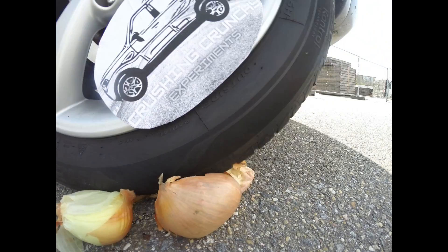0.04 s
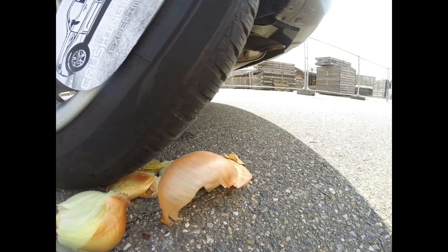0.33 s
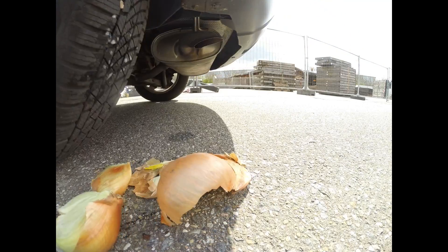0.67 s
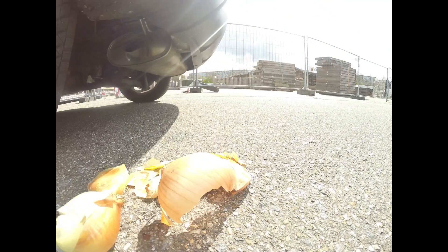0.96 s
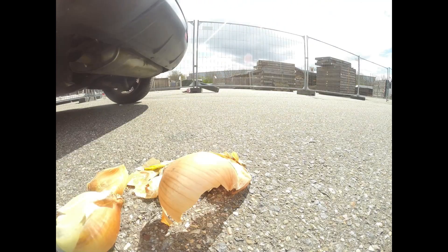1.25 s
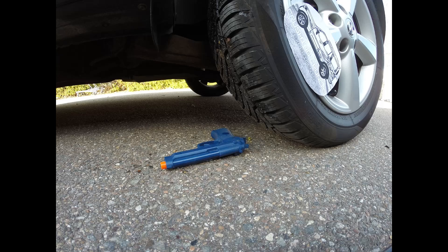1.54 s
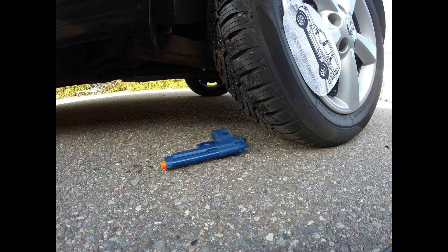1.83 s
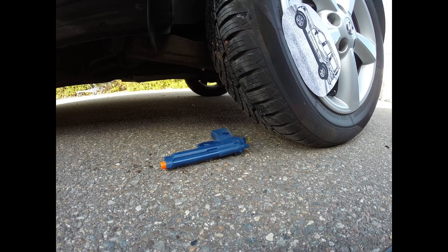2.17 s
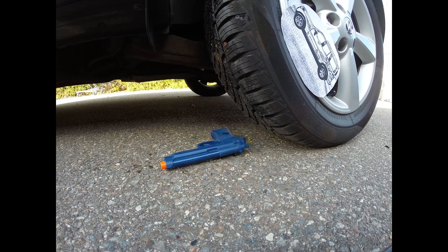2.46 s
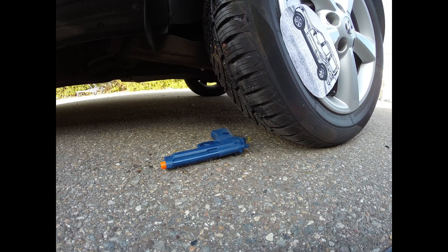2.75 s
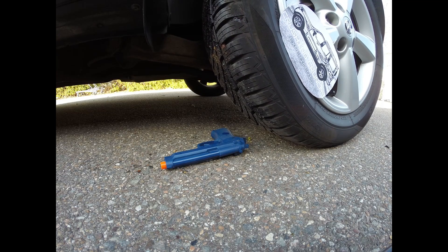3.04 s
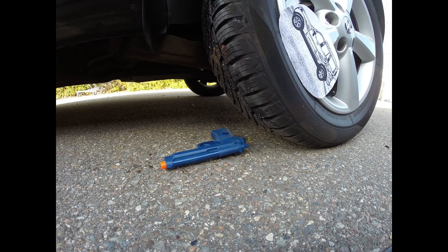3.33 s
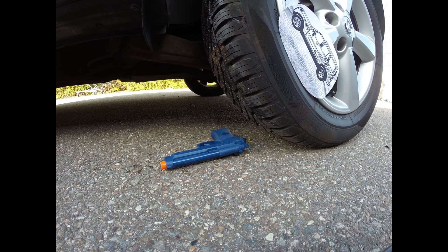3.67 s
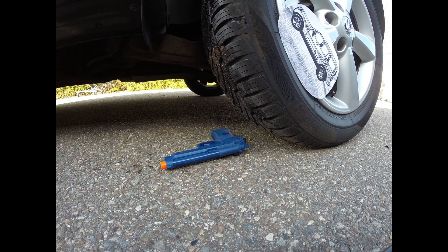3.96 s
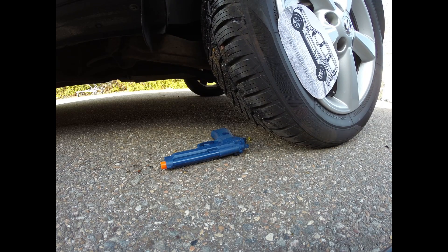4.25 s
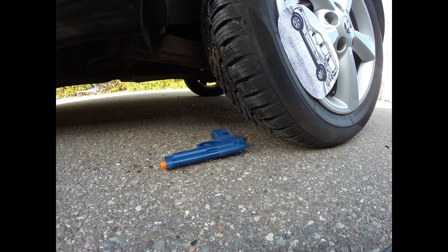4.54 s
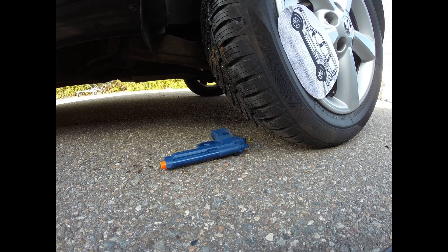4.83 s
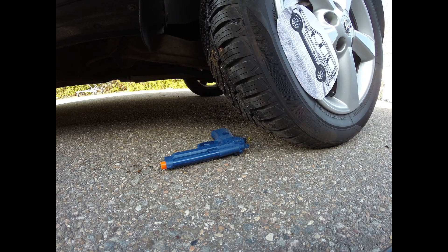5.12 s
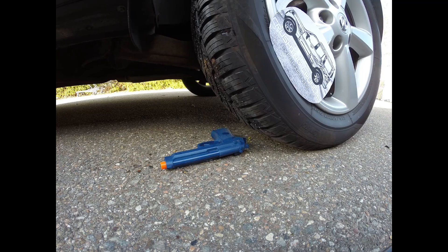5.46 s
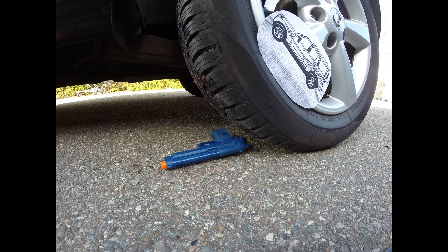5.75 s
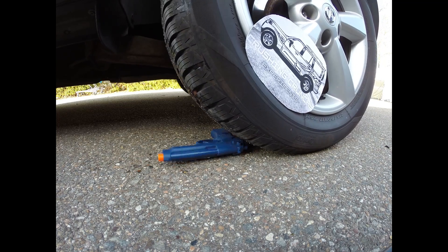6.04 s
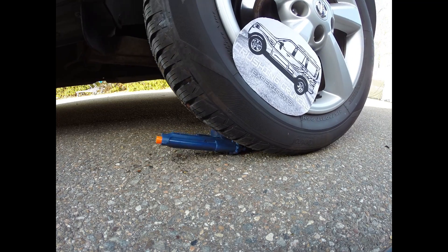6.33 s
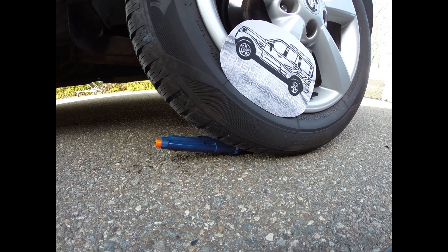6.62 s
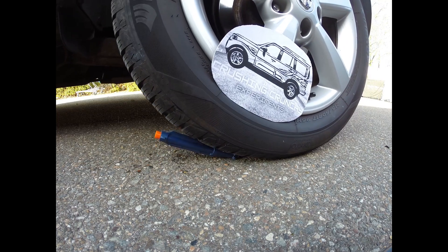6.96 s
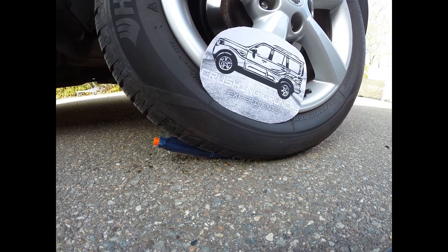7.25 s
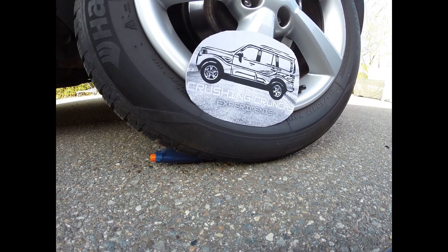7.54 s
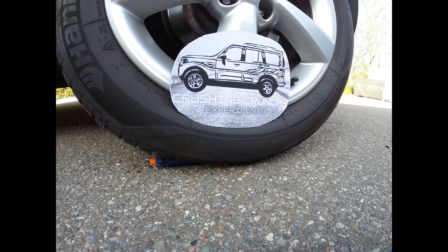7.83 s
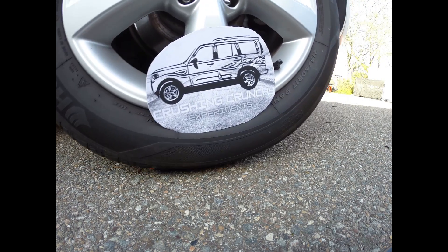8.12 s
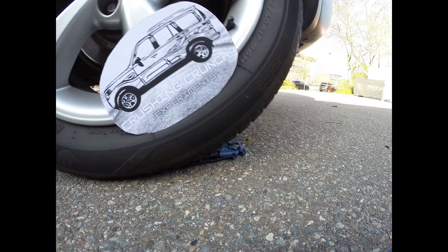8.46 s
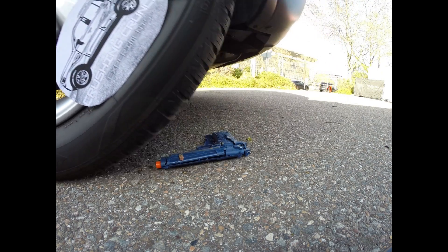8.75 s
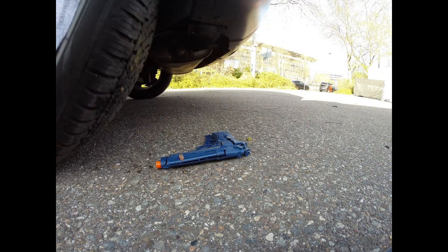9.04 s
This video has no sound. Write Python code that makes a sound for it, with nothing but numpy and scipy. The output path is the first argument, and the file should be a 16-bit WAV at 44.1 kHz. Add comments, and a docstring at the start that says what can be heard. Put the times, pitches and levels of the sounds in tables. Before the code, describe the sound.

Faint onion skin crackles under a creeping car, then a hollow plastic toy cracks loudly beneath the tyre over a low engine hum.

```python
"""On asphalt, close to the ground, a creeping car squashes an onion, whose skin snaps faintly.
After a brief silence a second scene begins: the tyre climbs a hollow plastic toy pistol. Brittle fracture
rings its shell in sharp cracks that echo under the car and set the tyre booming. The engine hums and
whirrs in both scenes, ducked by a limiter after the loudest cracks; something squeaks faintly and high."""
import sys
import numpy as np
from scipy import signal
from scipy.fft import rfft, irfft, next_fast_len
from scipy.io import wavfile
from scipy.ndimage import uniform_filter1d, minimum_filter1d, map_coordinates

SR = 44100
rng = np.random.default_rng(int(sys.argv[2]) if len(sys.argv) > 2 else 0)


def file_out(sig):
    """Save sig as 16-bit WAV at sys.argv[1]."""
    # one column per channel
    cols = np.atleast_2d(sig).T
    # limit, then scale
    lim = np.clip(cols, -1, 1)
    pcm = np.round(lim * 32767).astype(np.int16)
    wavfile.write(sys.argv[1], SR, pcm)


N = 405279

# Spectrum of a breaking shell. Each row: frequency in Hz, gain in dB.
SHELL_SPECTRUM = [(60, -5), (250, 3), (400, 0.5), (560, -1), (850, 2), (1200, -1), (1600, 3), (2500, -0.5),
                  (3500, 0), (4300, 9.5), (6500, 10), (8500, 4.5), (11000, -6.5), (15000, -25)]


def toy_cracks():
    """Impulse excitation: each break rings the hollow toy and drops the tyre, which rings too."""
    # Each row: start in seconds, level in dB, t60 in seconds, panel ring in Hz, splinter ring in Hz,
    # hollowness in dB, thump in dB.
    breaks = [(6.299, -47, 0.022, 2150, 4360, -14.5, -8), (6.3939, -45.5, 0.019, 1650, 4220, -11.5, -9),
              (6.4145, -49, 0.044, 1430, 6350, -15, -4), (6.895, 3, .049, 1560, 4130, 2.5, 2),
              (6.932, -5.5, 0.041, 2220, 6100, -1, 5), (6.95, -3, .028, 2350, 5660, -5, -1),
              (7.134, -40.5, 0.012, 2260, 4920, -1.5, -8.5), (7.3668, -33, .016, 800, 5695, 4.5, 4.5),
              (7.4523, -13, 0.027, 2250, 4640, 6.5, -17), (7.4744, -8.5, 0.019, 1570, 5180, -2, -13.5),
              (7.6435, -19, 0.015, 900, 4500, 5, 6), (7.7363, -20.5, 0.0087, 898, 5080, -8.5, -18),
              (7.783, -13.5, 0.01116, 1622, 5460, 7, -7), (7.868, -35.5, 0.014, 1506, 6300, 19, -15),
              (7.9112, -33, 0.023, 1500, 4370, 13, -20), (7.935, -15, 0.017, 2070, 4255, 1, -14.5),
              (8.1765, -0.5, .021, 1410, 6676, 0, 6.5), (8.2646, -23.5, .021, 1650, 5720, -8, -26),
              (8.2897, -23, 0.0255, 2180, 7300, -5.5, -20), (8.349, -25.5, 0.017, 1464, 7830, -3, -5.5),
              (8.38, -42, .025, 2040, 5880, -2, -6), (8.388, -30, 0.02, 2860, 6220, 3, -21),
              (8.4036, -41.5, 0.0167, 2780, 6410, 2, -9), (8.481, -35, 0.011, 2170, 4600, -1, -21),
              (8.539, -42.5, 0.012, 1480, 5030, -12, -20), (8.5606, -47.5, .019, 1440, 4200, -0.5, -9),
              (8.5902, -35, .021, 2220, 5290, -20, -11.5), (8.7141, -35.5, 0.033, 1670, 4230, 4.5, -18),
              (8.7637, -43, 0.077, 2120, 5085, 2, -10)]
    # Each row: resonance in Hz, width in Hz, lift in dB.
    toy_modes = [(380, 58, 3.5), (904, 130, 1), (1110, 120, 2), (1480, 110, 4), (1680, 62, 3.5),
                 (2197, 110, 6.5), (2400, 130, 3), (2780, 77, 5), (3003, 140, -6), (4290, 140, 4.5),
                 (5083, 220, 4.5), (5800, 190, 2.5), (6450, 290, 3.5), (7500, 170, -0.5), (8900, 360, 4.5)]
    # The echo weakens while the tread covers the toy. Each row: time in seconds, gain in dB.
    echo_gain = [(6.9, .5), (7.7, 3), (7.95, -1), (8.17, -6), (8.3, 1.5)]
    out = np.zeros(N)
    boom = tyre_ring()
    for s, level_db, t60, panel_hz, splinter_hz, hollow_db, thump_db in breaks:
        echo_db = np.interp(s, *np.transpose(echo_gain))
        crack = fracture(level_db, t60, panel_hz, splinter_hz, hollow_db, thump_db, echo_db, toy_modes)
        add(out, s, crack)
        add(out, s, amp(level_db + .3 * thump_db) * boom)
    return out


def onion_snaps():
    """Brittle fracture: the onion's skin splits in faint snaps, each with a slight thump."""
    # Each row: start in seconds, level in dB, t60 in seconds, splinter ring in Hz, hollowness in dB.
    snaps = [(.019, -46.5, 0.027, 4210, 4), (.129, -40.6, 0.027, 4400, 5.5), (.2848, -49, 0.033, 4190, 3),
             (0.4281, -46.5, .018, 5010, -14), (0.7684, -46.5, 0.0072, 6720, -14),
             (1.0749, -51.5, 0.0155, 4320, 2.5), (1.1034, -50, 0.024, 4560, 6.5),
             (1.2816, -57.5, 0.02, 6400, 0)]
    onion_hz = 2430
    out = np.zeros(N)
    for s, level_db, t60, splinter_hz, hollow_db in snaps:
        snap = fracture(level_db, t60, onion_hz, splinter_hz, hollow_db, thump_db=-8, echo_db=1.5)
        add(out, s, snap)
    return out


def fracture(level_db, t60, panel_hz, splinter_hz, hollow_db, thump_db, echo_db, modes=()):
    """Source and filter: a split runs in a burst of tiny jerks, and the freed pieces resonate."""
    # Share of a crack that the car's underside returns. Each row: frequency in Hz, gain in dB.
    reflection = [(100, -11), (230, -8.5), (500, -12), (1500, -6), (2000, -4.5), (2600, 1), (3200, -1),
                  (4500, -12), (6500, -13.5), (9000, -22), (14000, -16)]
    t = np.arange(8192) / SR
    hz = np.fft.rfftfreq(len(t), 1 / SR)
    jerks = rng.standard_normal(len(t)) * amp(2 * rng.standard_normal(len(t)))
    split = np.exp(-(t / (.11 * t60)) ** 3)  # runs, then stops short
    edge_chatter = amp(-8.5 - 60 * t / .018)
    attack = 1 - np.exp(-t / .00034)
    burst = jerks * (split + edge_chatter) * attack
    # A brittle break drives all frequencies about alike, so the burst's own colour is divided out.
    burst_power = uniform_filter1d(np.abs(rfft(burst)) ** 2, size=60)
    burst_colour = np.sqrt(np.abs(burst_power) + 1e-12)
    ring = 1 + 1.9 * bump(hz, panel_hz, 240) + 1.42 * bump(hz, splinter_hz, 440)
    # Long splits knock less; long or hard ones are brighter; the covering tread muffles the top.
    doublings = np.log2(t60 / .02)
    knock_db = 3 + .4 * hollow_db - 3.5 * doublings
    bright_db = 1 + .1 * level_db + 1.5 * doublings + .8 * echo_db
    lifts = [(380, thump_db), (620, knock_db), (1400, hollow_db), (2900, hollow_db),
             (3900, .0027), (6800, 0), (8500, bright_db)]
    colour = resonant_gain(hz, SHELL_SPECTRUM, modes) * amp(along(lifts, hz))
    colour *= band(hz, 115, SR, order=2)
    colour /= np.sqrt(np.mean((colour * ring) ** 2) / (SR / 100))  # energy of 10 ms at rms 1
    direct = causal(burst, lambda f: colour * ring / burst_colour)
    reflected = causal(signal.unit_impulse(len(t)), lambda f: colour * amp(along(reflection, f) + echo_db))
    return amp(level_db) * (direct + underside_echo(reflected))


def underside_echo(x):
    """Reverberation: floor pan, wheel arch and road return a diffuse, exponentially decaying tail."""
    # Each row: frequency in Hz, t60 in seconds.
    decay_times = [(150, 0.14), (600, 0.098), (2000, 0.11), (6000, 0.1), (14000, 0.13)]
    hz, t, spectra = signal.stft(rng.standard_normal(SR // 4), SR, nperseg=256)
    decay = amp(-60 * t / along(decay_times, hz)[:, None])
    _, tail = signal.istft(spectra * decay, SR, nperseg=256)
    tail *= 1 - np.exp(-(np.arange(len(tail)) / SR / .0012) ** 2)  # reflections build up
    return signal.fftconvolve(x, tail / np.linalg.norm(tail))[:len(x)]


def tyre_ring():
    """Damped free vibration: the tyre bounces and its air cavity booms on."""
    # Each row: frequency in Hz, t60 in seconds, level in dB.
    modes = [(213, 1.4, -52), (84, 0.54, -44)]
    t = np.arange(2 * SR) / SR
    return sum(np.sqrt(2) * np.sin(2 * np.pi * hz * t) * amp(db - 60 * t / t60) for hz, t60, db in modes)


def grit():
    """Shot noise: skin, stones and splinters tick at random under the tread."""
    # Each row: start in seconds, end in seconds, number of ticks, base level in dB.
    runs = [(0, 0.169, 38, -42), (0.167, 0.498, 26, -43.5), (0.497, 1.3, 6, -43), (8.205, 8.868, 55, -43)]
    impulses = np.zeros(N)
    for start, end, count, db in runs:
        position, weakness = rng.random((int(count), 2)).T
        samples = ((start + (end - start) * position) * SR).astype(int).clip(0, N - 1)
        impulses[samples] += amp(db + 7.5 - 9.9 * weakness)
    ticks = causal(impulses, lambda hz: amp(along(SHELL_SPECTRUM, hz)) * band(hz, 3800, 13000, order=3))
    return ticks + amp(-6) * underside_echo(ticks)


def engine_at_toy():
    """Periodic firing gives a harmonic series; a hum climbs above it and the loaded belts whine."""
    # Each row: time in seconds, frequency in Hz, level in dB.
    hum_track, firing_track = [(2.7, 103.8, -71), (3.9, 124.4, -61), (4.8, 129.5, -60), (5.3, 139.3, -63),
                               (5.65, 142, -58.5), (6.15, 149, -62.5), (6.6, 152.7, -78), (7.2, 154, -84.5)], [(1.6, 31.7, -67), (3.1, 37, -67), (3.7, 30.8, -67.5),
                                                 (4.1, 24.7, -60), (5.2, 26.3, -64.5), (5.6, 28, -68),
                                                 (6.4, 24.7, -66), (7.1, 24, -80)]
    # Each row: multiple of the firing rate, gain in dB.
    harmonics = [(1, -0.5), (2, -13), (3, -4.5), (4, -2), (7, -11)]
    # Each row: pitch in Hz, gain in dB.
    belt_tones = [(1381, 1.5), (843, -2.5)]
    # Each row: time in seconds, level in dB.
    belt_load, whirr, rumble = [(5.5, -90), (6.2, -71.5), (6.9, -67), (8.1, -63.5), (8.3, -64), (8.7, -84),
                                (9.19, -78)], [(1.95, -60.5), (3.2, -59), (4.0, -61), (5.38, -61.5),
                                              (5.46, -59), (5.8, -55), (6.87, -55), (7.25, -53.5),
                                              (7.8, -57.5), (8.07, -56.5), (8.4, -59.5), (8.75, -57.5),
                                              (9.19, -57.5)], [(1.95, -59.5), (2.6, -60.5), (3.3, -58),
                                                               (6.3, -58), (7.3, -57.5), (8, -63.5),
                                                               (8.6, -62), (9, -58)]
    # Each row: frequency in Hz, gain in dB.
    bay_spectrum = [(20, -6), (45, -3.5), (75, -3.5), (130, -9), (200, -9), (420, -14.5), (1200, -18.5),
                    (1700, -19), (3000, -22), (4400, -22.5), (6500, -24), (8000, -34.5), (12400, -49.5),
                    (15000, -51.5)]
    # Each row: resonance in Hz, width in Hz, lift in dB.
    cover_modes = [(564, 44, 2.5), (855, 33, 2), (1217, 130, -2), (1440, 110, 6.5), (1649.8, 180, 7.5),
                   (2135, 100, 4.5), (3030, 170, -6), (3544, 76, 4), (4350, 110, 7.5), (4675, 95, 5),
                   (5900, 220, 5), (6086, 270, -10), (6510, 272, 0), (7500, 2200, -4.5)]
    hum_hz, hum_db = curves(hum_track)
    hum = amp(hum_db + 2 * wobble(11)) * tone(hum_hz * (1 + .008 * wobble(14)))
    firing_hz, idle_db = curves(firing_track)
    firing_hz *= 1 + .006 * wobble(12)
    idle = amp(idle_db + 1.7 * wobble(6.3)) * harmonic_tone(firing_hz, harmonics)
    load_db, = curves(belt_load)
    belts = sum(amp(load_db + db + 1.7 * wobble(27)) * tone(hz * (1 + .007 * wobble(50)))
                for hz, db in belt_tones)
    noise = engine_bay(whirr, rumble, bay_spectrum, cover_modes, hiss_db=-1.5)
    return noise + idle + hum + belts


def engine_at_onion():
    """Harmonics over noise: the exhaust note swells and eases off, and the tread drones briefly."""
    # Each row: time in seconds, frequency in Hz, level in dB.
    exhaust_track = [(0, 66.3, -63), (.5, 65.9, -63.5), (.92, 69.3, -56), (1.3, 62.4, -66.5),
                     (1.55, 57.8, -68)]
    # Each row: time in seconds, level in dB.
    whirr, rumble = [(0, -49), (.05, -51), (.32, -53), (.92, -54.5), (1.55, -58)], [(0, -58.5), (1.55, -59)]
    # Each row: frequency in Hz, gain in dB.
    bay_spectrum = [(12, -40), (20, -7), (68, -5.5), (158, -8.5), (198, -9.5), (310, -8.5), (558, -7),
                    (897, -15), (1480, -8.5), (2600, -19), (4300, -19.5), (6720, -26.5), (12400, -46.5),
                    (14700, -43), (16000, -65)]
    # Each row: resonance in Hz, width in Hz, lift in dB.
    cover_modes = [(410, 70, -1), (568.4, 54, 5), (850, 29.4, 6), (1160, 270, 0), (1406, 100, 5.5),
                   (1545, 103, 5), (1950, 89, 0.5), (2387, 153, 8), (2600, 180, -0.5), (2940, 66, 6),
                   (3270, 300, -2.5), (4240, 113, 7), (6750, 500, -1.5), (8060, 1400, -8.5)]
    hz, exhaust_db = curves(exhaust_track)
    hz *= 1 + .011 * wobble(13.87)
    exhaust = amp(exhaust_db) * (tone(hz) + amp(1.2) * tone(3 * hz))
    tread_db, = curves([(.2, -76), (.6, -55.5), (1.1, -90)])
    tread = amp(tread_db) * coloured_noise(lambda f: bump(f, 440, width=70))
    return exhaust + tread + engine_bay(whirr, rumble, bay_spectrum, cover_modes, hiss_db=-3)


def engine_bay(whirr, rumble, spectrum, cover_modes, hiss_db):
    """Resonant covers and cavities colour the exhaust's rumble, the whirr of belts and fan, and a hiss."""
    whirr_db, = curves(whirr)
    rumble_db, = curves(rumble)
    effort_db = whirr_db - np.mean([db for s, db in whirr])
    treble_db = whirr_db + hiss_db + .25 * effort_db  # hiss grows faster than whirr
    bands = [(22, 250, rumble_db, .7), (250, 2800, whirr_db, .7), (2800, 15500, treble_db, .5)]
    out = np.zeros(N)
    for low_hz, high_hz, db, flutter_db in bands:
        noise = coloured_noise(lambda f: resonant_gain(f, spectrum, cover_modes) * band(f, low_hz, high_hz))
        out += noise * amp(db + flutter_db * wobble(45))
    return out


def shudder(peak_s=5.68, half_length_s=.091, hz=85, glide_hz_per_s=130):
    """A chirp under a Gaussian envelope: the car throbs as it takes up the drive."""
    t = np.arange(N) / SR - peak_s
    return amp(-55) * np.exp(-(t / half_length_s) ** 2) * tone(hz + glide_hz_per_s * t)


def squeaks():
    """Missing fundamental: short, wavering squeaks sound only through their overtones."""
    # Each row: start in seconds, length in seconds, fundamental in Hz, level in dB.
    events = [(3.05, .02, 3370, -70), (3.073, .028, 3285, -66.5), (3.175, 0.035, 3310, -68),
              (3.202, 0.029, 3350, -68), (3.24, 0.026, 3335, -66)]
    # Each row: multiple of the fundamental, gain in dB.
    overtones = [(2, 0), (3, -11), (4, -10)]
    out = np.zeros(N)
    for s, length, hz, db in events:
        swell = signal.windows.tukey(int(length * SR))
        pitch = hz * (1 + .01 * wobble(900)[:len(swell)])
        add(out, s, amp(db) * swell * harmonic_tone(pitch, overtones))
    return out


def whines():
    """Random frequency modulation: thin high tones waver over a faint hiss."""
    # Each row: frequency in Hz, level in dB.
    partials = [(4301, -76), (4630, -83.5), (5674, -76.5), (6202, -77), (9469, -84), (11838, -89),
                (14207, -82)]
    tones = sum(amp(db) * tone(hz + 5 * wobble(40)) for hz, db in partials)
    return tones + amp(-78.5) * coloured_noise(lambda hz: band(hz, 6000, 11000, order=3))


def limiter(x, ceiling_db=-11, window_s=.0097, recovery_db_per_s=10):
    """Automatic gain control: the gain drops when the rms passes the ceiling, then creeps back."""
    power = np.abs(uniform_filter1d(x ** 2, size=int(window_s * SR)))
    over_db = np.maximum(10 * np.log10(power + 1e-20) - ceiling_db, 0)
    recovered_db = recovery_db_per_s * np.arange(N) / SR
    cut_db = np.maximum.accumulate(over_db + recovered_db) - recovered_db
    return x * uniform_filter1d(minimum_filter1d(amp(-cut_db), size=128), size=128)


def amp(db):
    """Decibels as an amplitude ratio."""
    return 10 ** (np.asarray(db) / 20)


def along(points, hz):
    """Interpolation of (Hz, value) points on a log frequency axis."""
    f, v = np.transpose(points)
    return np.interp(np.log(hz + 1), np.log(f + 1), v)


def curves(rows):
    """Linear interpolation: one value per sample for each column after the time."""
    s, *cols = np.transpose(rows)
    return [np.interp(np.arange(N) / SR, s, c) for c in cols]


def wobble(rate):
    """A smooth random curve with rate knots a second."""
    knots = rng.standard_normal(int(N * rate / SR) + 4)
    return map_coordinates(knots, [np.arange(N) * rate / SR])


def filtered(x, gain):
    """Zero-phase filtering by a gain that depends on frequency."""
    size = next_fast_len(len(x) + 8192)
    return irfft(rfft(x, size) * gain(np.fft.rfftfreq(size, 1 / SR)), size)[:len(x)]


def coloured_noise(gain):
    """Filtered white noise of rms 1."""
    noise = filtered(rng.standard_normal(N), gain)
    return noise / np.sqrt(np.mean(noise ** 2) + 1e-20)


def causal(x, gain, size=8192):
    """Minimum-phase filtering: nothing sounds before the blow."""
    magnitude = np.maximum(gain(np.fft.rfftfreq(size, 1 / SR)), 1e-5)
    cepstrum = irfft(np.log(magnitude))
    cepstrum[1:size // 2] *= 2
    cepstrum[size // 2 + 1:] = 0
    return signal.fftconvolve(x, irfft(np.exp(rfft(cepstrum))))[:len(x)]


def band(hz, lo, hi, order=6):
    """Gain of a band-pass."""
    return 1 / np.sqrt((1 + (lo / (hz + 1)) ** (2 * order)) * (1 + (hz / hi) ** (2 * order)))


def bump(hz, centre, width):
    """A resonance curve of height 1."""
    return 1 / (1 + (2 * (hz - centre) / width) ** 2)


def resonant_gain(hz, spectrum, modes):
    """A broad spectrum with resonant peaks and dips."""
    return amp(along(spectrum, hz) + sum(db * bump(hz, centre, width) for centre, width, db in modes))


def tone(hz):
    """A sine of rms 1 that follows a pitch curve."""
    return np.sqrt(2) * np.sin(2 * np.pi * np.cumsum(hz) / SR)


def harmonic_tone(hz, harmonics):
    """Sines at whole multiples of a pitch curve."""
    return sum(amp(db) * tone(round(k) * hz) for k, db in harmonics)


def add(out, s, x):
    """Mix x into out from s seconds on."""
    room = out[max(round(s * SR), 0):][:len(x)]
    room += x[:len(room)]


def scene():
    """Superposition of the sources in two scenes; after a short silence the second fades in."""
    first_end_s, second_start_s = 1.577, 1.613
    fade_db, fade_s = -7, .334
    t = np.arange(N) / SR
    first = t < first_end_s
    second = (t > second_start_s) * amp(fade_db * np.clip(1 - (t - second_start_s) / fade_s, 0, 1))
    car = first * engine_at_onion() + second * (engine_at_toy() + shudder())
    car += (first + second) * whines()
    return (car + toy_cracks() + onion_snaps() + grit() + squeaks())[None]


def record(dry):
    """Limiting and saturation: the loudest cracks duck everything and flatten; a low-pass follows."""
    limited = limiter(dry[0])
    saturated = limited / (1 + np.abs(limited / .95) ** 4) ** (1 / 4)
    return filtered(saturated, lambda hz: band(hz, 0, 15500, order=60))[None]


dry = scene()
out = record(dry)
file_out(out)
```